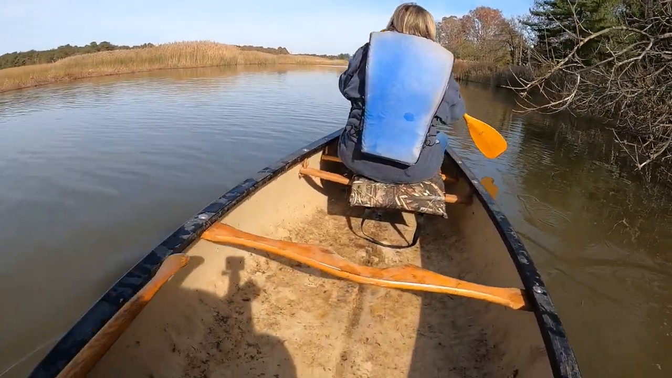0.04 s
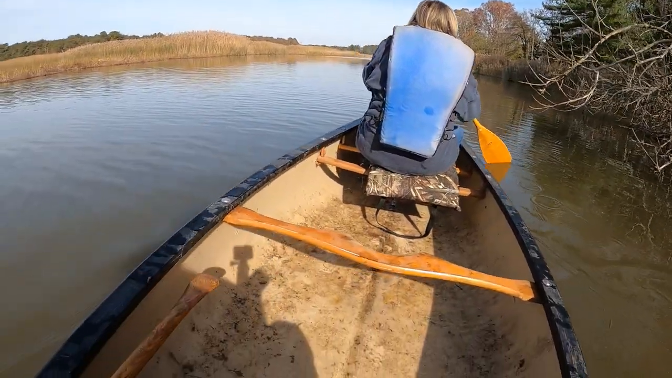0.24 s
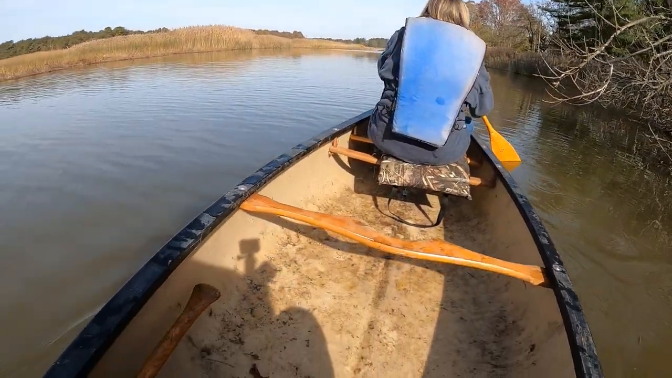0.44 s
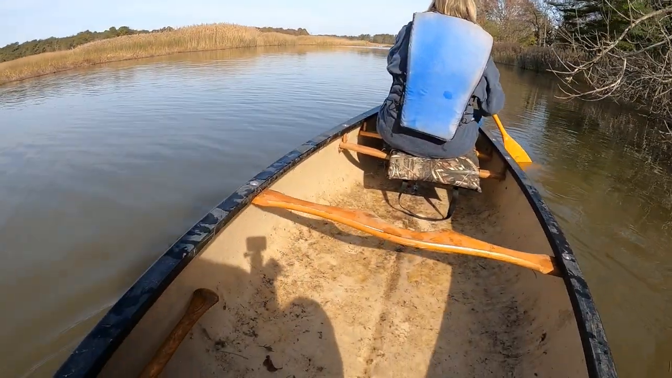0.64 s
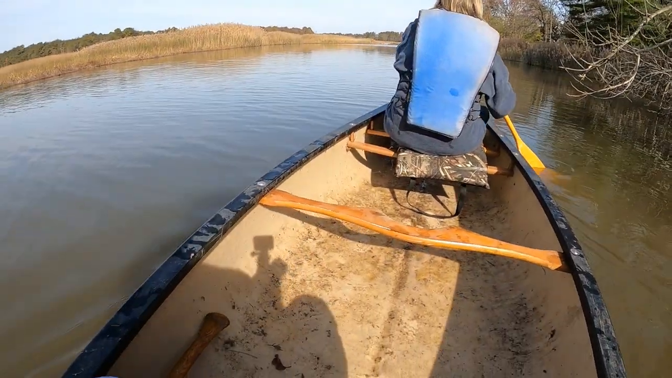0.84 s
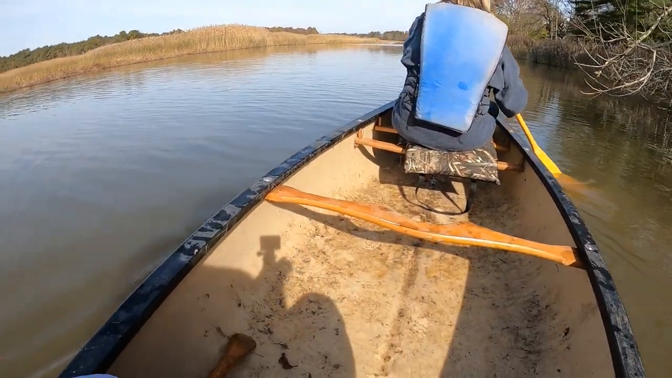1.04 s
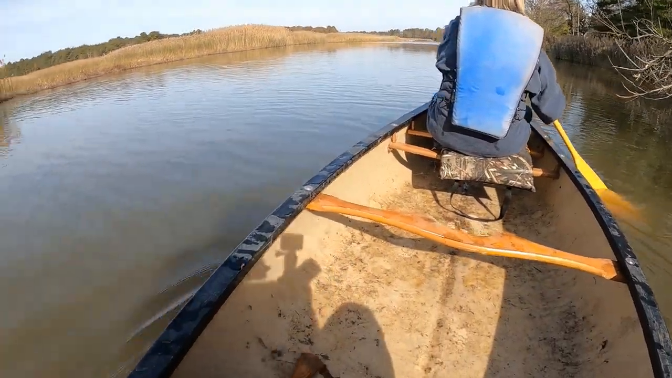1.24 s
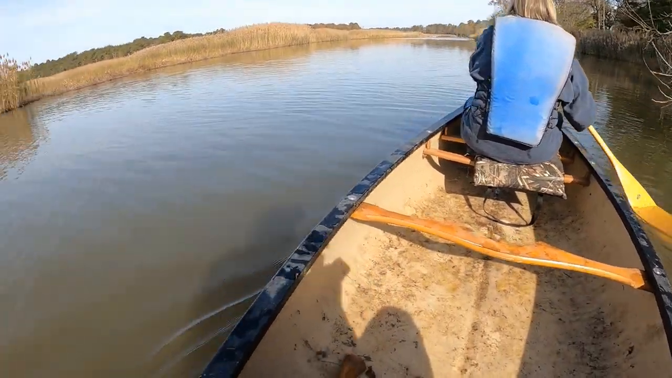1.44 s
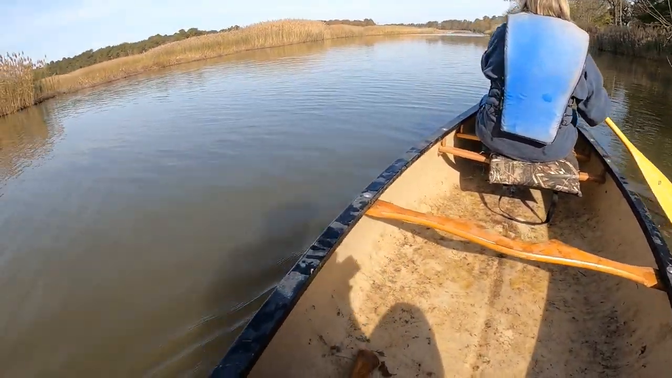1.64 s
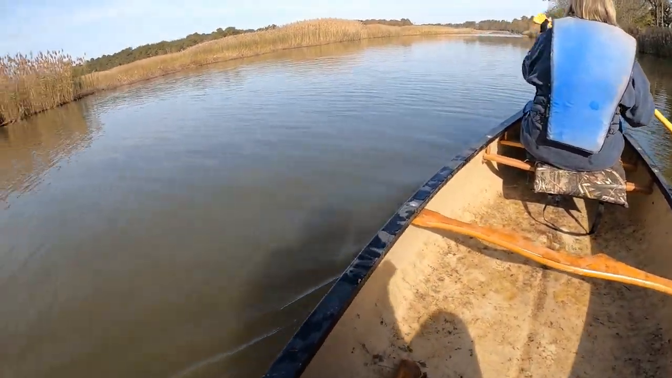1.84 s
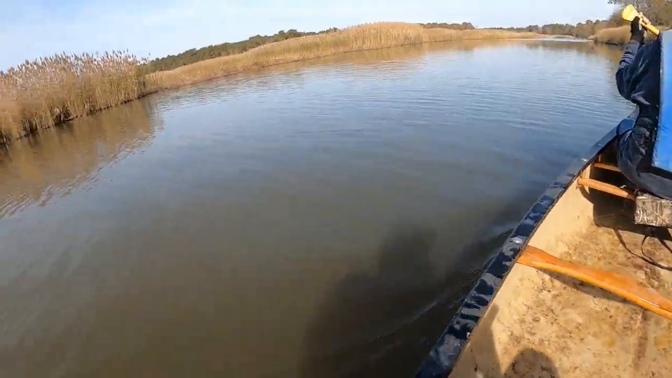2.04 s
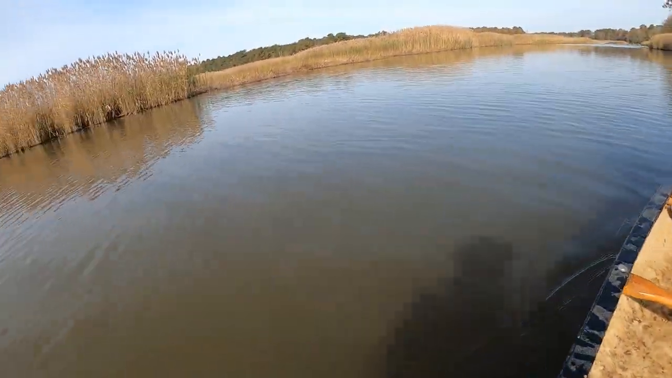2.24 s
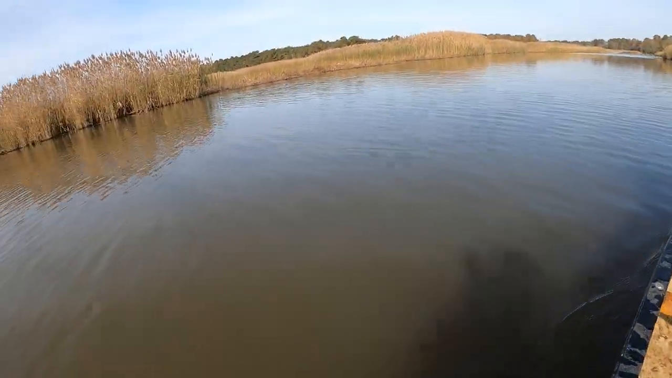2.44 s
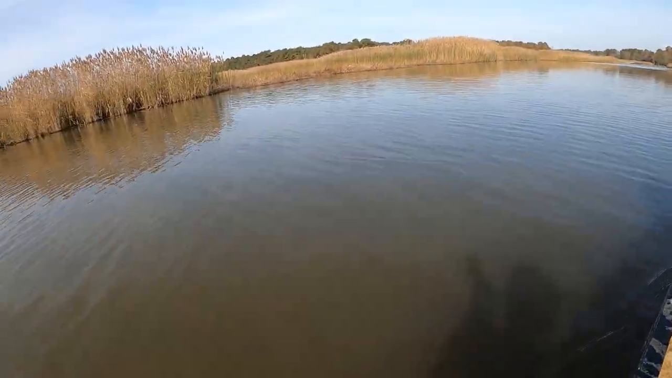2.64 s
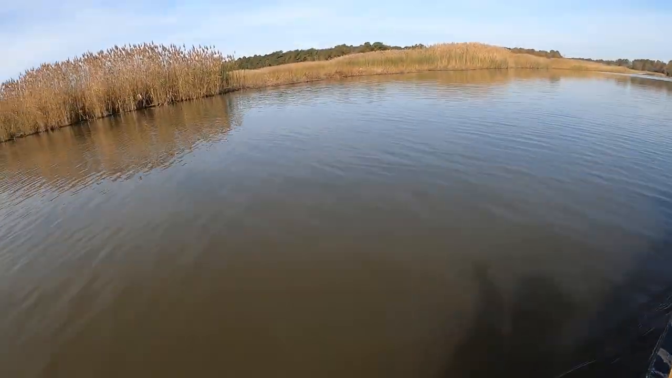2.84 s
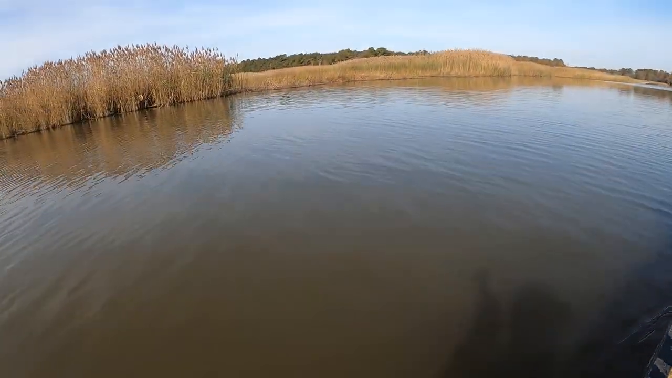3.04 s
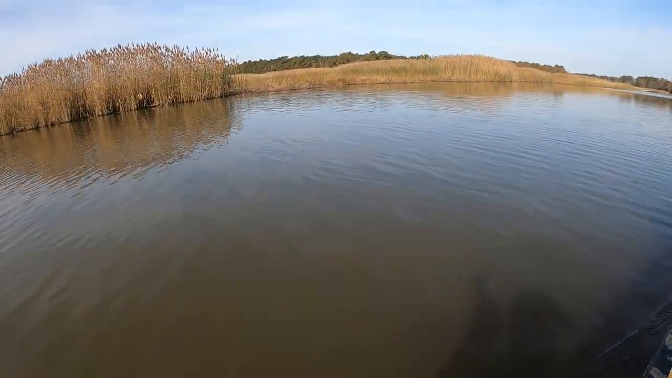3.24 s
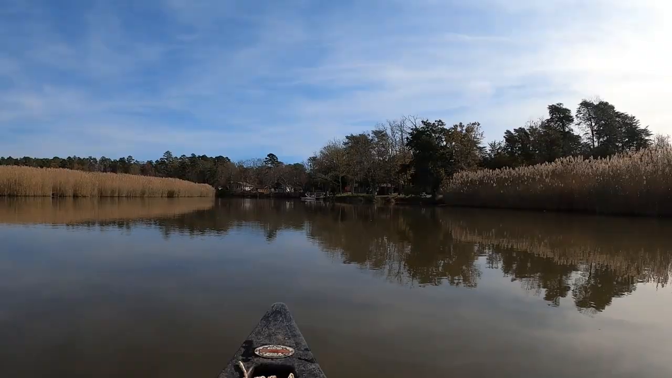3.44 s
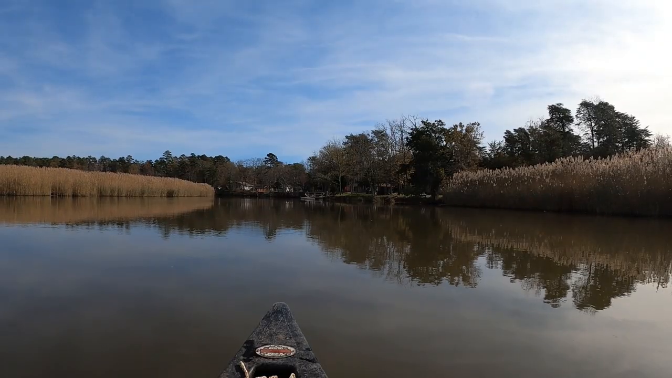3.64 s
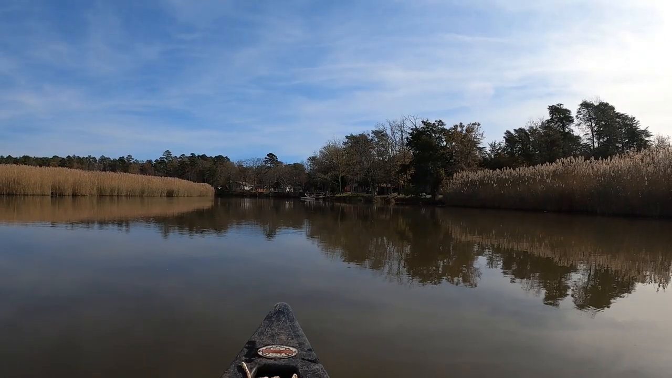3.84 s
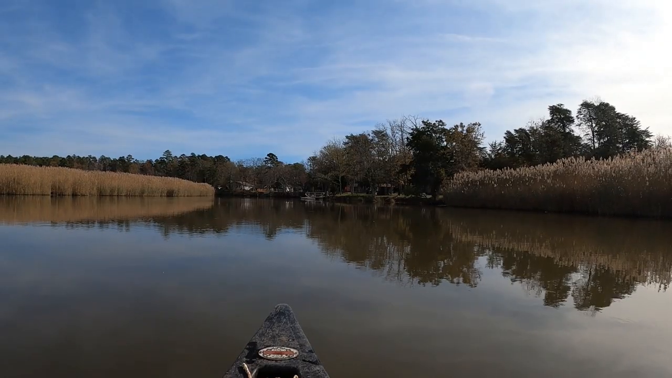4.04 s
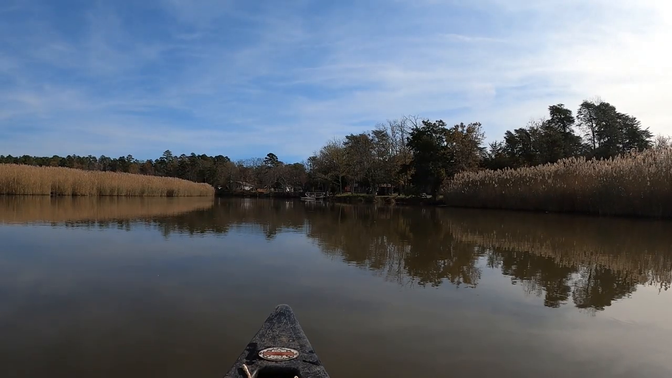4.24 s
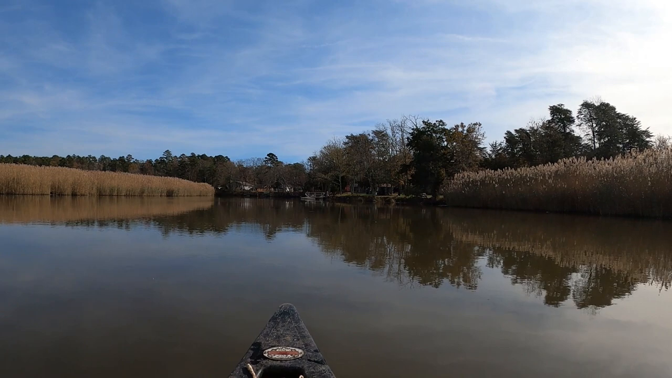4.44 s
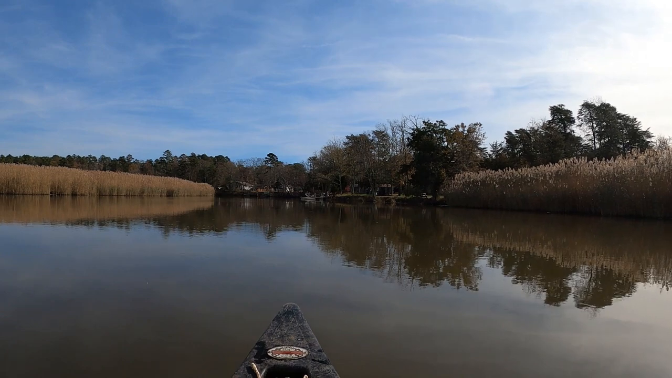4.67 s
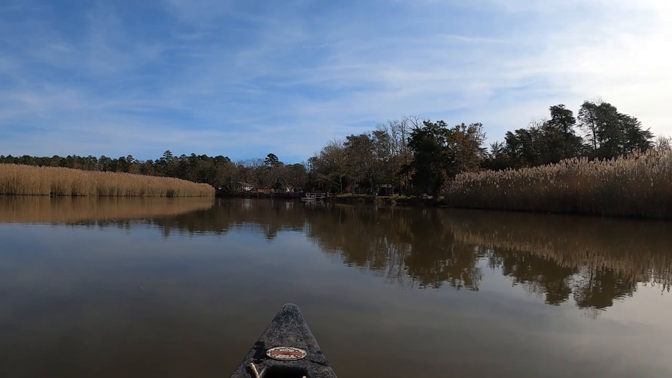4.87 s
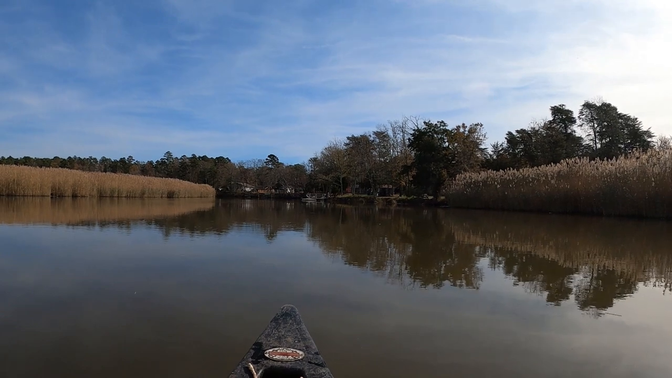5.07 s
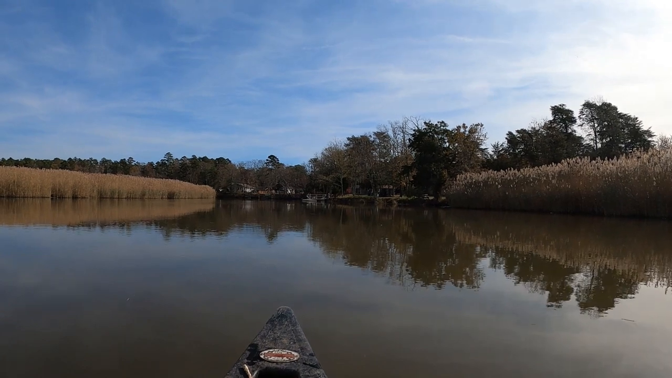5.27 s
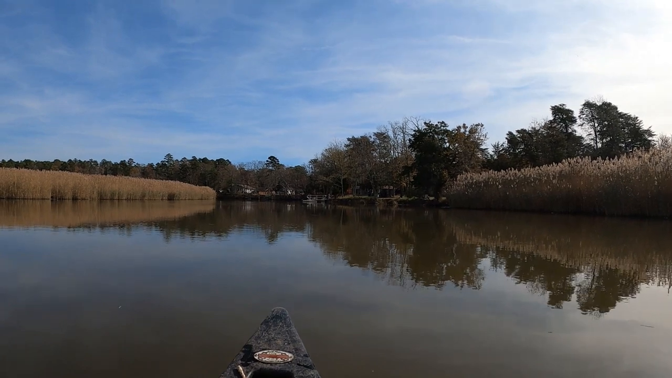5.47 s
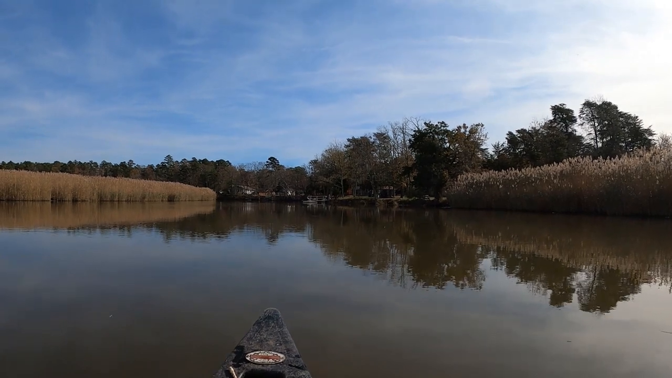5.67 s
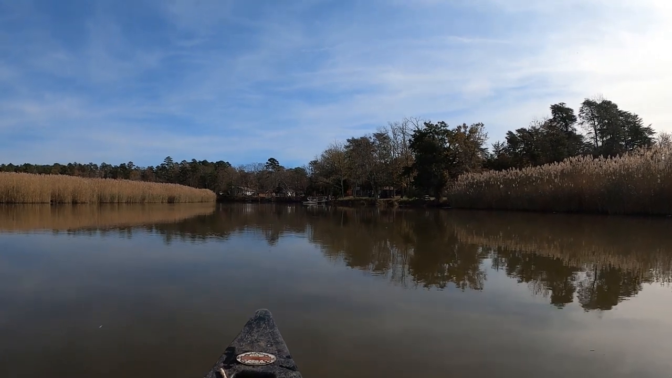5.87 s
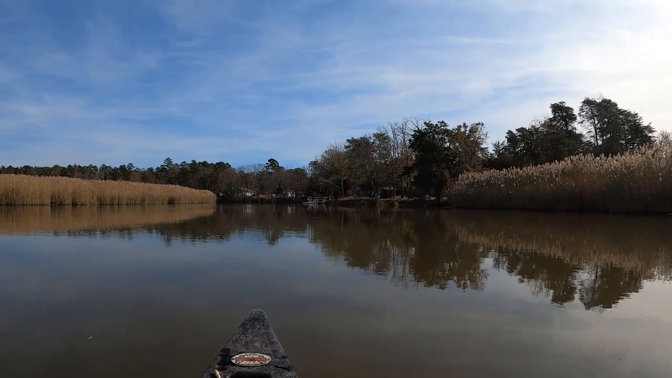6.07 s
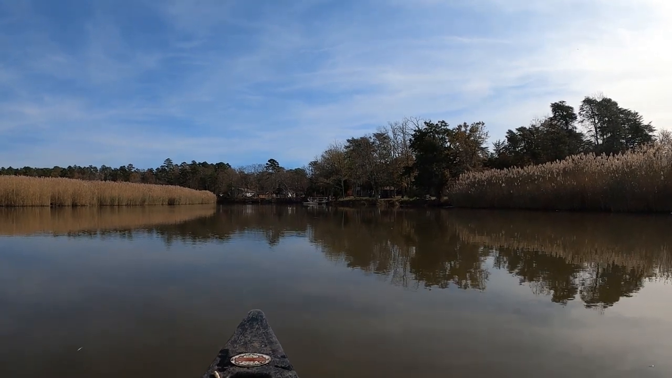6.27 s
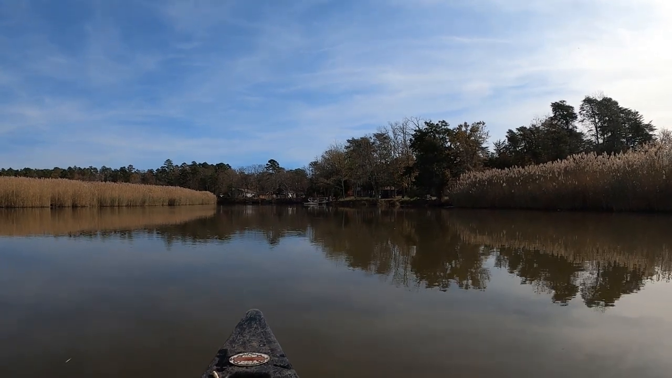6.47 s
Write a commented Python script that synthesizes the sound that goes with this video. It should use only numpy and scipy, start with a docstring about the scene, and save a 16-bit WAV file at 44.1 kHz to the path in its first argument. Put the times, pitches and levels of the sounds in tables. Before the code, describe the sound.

Hollow knocks and scrapes on a canoe hull over a low motor hum, then handling clicks, a brief gap, and quiet open water with small gurgles.

```python
"""In a canoe on open water, a wooden paddle is laid down: struck shaft and hull modes ring as it bounces and skids.
An electric trolling motor hums on its shaft orders; a nylon sleeve swishes as grainy noise and the mount ticks.
After a short silence the scene moves to the bow: filtered noise makes a low rumble with a faint hiss,
a far bird whistles in arcs of pitch, and water slaps and gurgles as spray noise and ringing bubbles."""
import sys
import numpy as np
from scipy import signal
from scipy.fft import rfft, irfft, next_fast_len
from scipy.io import wavfile
from scipy.ndimage import map_coordinates

SR = 44100
rng = np.random.default_rng(int(sys.argv[2]) if len(sys.argv) > 2 else 0)


def transcribe(signal):
    """Save signal, clipped to [-1, 1], as a 16-bit WAV file at the path in sys.argv[1]."""
    frames = np.atleast_2d(signal).T
    limited = np.clip(frames, -1, 1)
    pcm = np.round(limited * 32767).astype(np.int16)
    wavfile.write(sys.argv[1], SR, pcm)


N = 287119
TIME = np.arange(N) / SR  # s
RING = np.arange(SR // 2) / SR  # half a second for each short sound, s

# Rumble level through each view: t/s, level/dB
STERN_FLOW = [(0, -38), (.55, -36.5), (.8, -40.5), (.9, -45), (1.1, -38.5), (1.7, -41), (2.15, -38.5),
              (2.5, -40.5), (3.3, -43)]
BOW_FLOW = [(3.6, -44.5), (4.05, -42.5), (4.3, -45), (5.5, -46), (6.5, -44)]
# Spectra of the rumble at stern and bow, and of the open-air hiss: f/Hz, level/dB
STERN_RUMBLE = [(15, -2), (30, 2), (70, 8.5), (110, 0), (180, -3), (260, -11.5), (400, -26), (800, -53),
                (2000, -69.5)]
BOW_RUMBLE = [(12, -5.5), (25, -5.5), (60, 1), (100, -2), (150, -8), (220, -9.5), (290, -10), (360, -23.5),
              (450, -29.5), (700, -36), (2000, -74.5)]
AIR = [(250, -14), (500, -2), (700, -4.5), (1000, -1.5), (1500, -6), (2200, -10.5), (3200, -14.5),
       (4500, -16), (6000, -18), (7500, -19.5), (9000, -33), (12000, -37.5), (15000, -49.5)]
# Left-right correlation of the rumble: f/Hz, correlation
LOW_ALIKE = [(25, 0.71), (70, 0.95), (200, 0.92), (500, 0.64), (1200, 0.26)]
STERN_AIR_DB, BOW_AIR_DB = -28.5, -31.5  # hiss relative to the rumble

# Motor shaft speed: t/s, f/Hz
MOTOR = [(0, 57.8), (1.4, 62.5), (2.3, 63.39), (3.28, 64.25)]
# Shaft orders from 1 upward: level at cruising speed/dB rms, growth with speed/(dB per Hz)
HUM = [(-40, 1.77), (-41, 3), (-60, 3), (-65, 1)]
CRUISE_HZ = 64

# Sleeve strokes: start t/s, end t/s, level at the end/dB, low-pass f/Hz
SWISHES = [(0.053, 0.105, -56, 4440), (0.728, 0.82, -69, 5470), (1.074, 1.242, -51, 3300),
           (1.464, 1.511, -58, 5200), (1.829, 1.905, -57, 3700), (1.969, 2.058, -48.5, 3520),
           (2.036, 2.105, -42.5, 3350), (2.147, 2.428, -64, 2350), (2.402, 2.501, -57, 3280),
           (2.522, 2.566, -50, 4190), (2.571, 2.743, -56.5, 4650), (4.324, 4.55, -74, 5170)]
# Spectrum of nylon rubbing: f/Hz, level/dB
NYLON = [(200, 4.5), (900, -1), (1500, -4), (2300, -1), (3300, -1), (4600, -2), (6000, -2.5), (7500, -2),
         (9000, -9), (12000, -7.5), (15000, -22)]
SWELL_DB, SLEEVE_EDGE_S = 4.5, .033  # growth over a stroke; soft start and stop

# Ticks on the mount: t/s, level/dB, spectral peak f/Hz
TICKS = [(.083, -46, 3620), (1.046, -49.5, 6370), (1.464, -50, 6100), (1.48, -47.5, 3000),
         (1.976, -44.5, 1950), (2.077, -29.5, 1640), (2.441, -32, 3300), (2.891, -50.5, 4800),
         (2.965, -31.5, 3420)]
# Soft pushes on the mount: t/s, level/dB before the envelope
BUMPS = [(2.08, -23), (2.273, -19), (2.963, -43)]
BUMP_HZ, BUMP_T60, BUMP_RISE_S = 60, .08, .014
# Modes of the plastic housing: f/Hz, relative level/dB
HOUSING = [(560, -3.5), (680, 0.5), (790, -3.5), (930, -2.5), (1250, -26.5), (1950, -13.5)]
HOUSING_T60 = .055  # s
# Ring under a tick of HOUSING_HZ; sharper ticks ring the housing less
HOUSING_DB, HOUSING_HZ, HOUSING_DB_PER_OCTAVE = -6.5, 2410, -2.5
# Stereo tilt of sleeve and ticks through the housing: f/Hz, left minus right level/dB
HANDLING_BALANCE = [(150, 4), (450, -6.5), (1000, -0.5), (2000, 2.5), (4200, 5), (8000, 1)]

# Paddle blows: t/s, strength/dB, hardness (low-pass) f/Hz, boom level before a common gain/dB, boom f/Hz
KNOCKS = [(.305, -18, 4300, -7.5, 171.6), (.336, -24.5, 1000, -25, 262.3), (.357, -27.5, 1990, -19, 129.5),
          (.377, -32, 900, -14, 166.8), (.408, -21.5, 3020, -20, 147.3), (.491, -39.5, 2400, -40, 134.5),
          (.553, -25.5, 2800, -18, 116.7), (0.592, -25.5, 1770, -19, 141.8),
          (.625, -24.5, 3080, -15.5, 122.2), (0.655, -41, 7100, -17, 117.7), (1.045, -32, 2300, -23, 227.6),
          (1.063, -31.5, 1370, -14.5, 154.6), (1.117, -36.5, 1210, -21.5, 158.6),
          (1.195, -40, 870, -25, 147.1), (1.522, -31, 1090, -26, 130.7), (1.54, -26.5, 712, -27, 136),
          (1.578, -39.5, 600, -34.5, 178.7), (1.592, -37, 650, -27.5, 184)]
# Modes of the wooden shaft: f/Hz, relative level/dB, T60/s
SHAFT = [(1126, -8, .065), (1284, -5.5, 0.069), (1533, -3, .06), (1712, -5.5, 0.03), (1963, 2, 0.053),
         (2200, 2.5, 0.041), (2430, -11, 0.082), (2680, -9, 0.041), (2820, -9.5, 0.074),
         (3250, -9.5, 0.056), (3580, -8.5, 0.045), (3770, -9.5, 0.051), (4130, -22, 0.028),
         (4500, -22.5, 0.033), (5680, -15, .035)]
# Modes of the hull panels: f/Hz, relative level/dB, T60/s
HULL = [(70, 0, 0.38), (92, -3, 0.43), (118.4, -0.5, 0.34), (161.4, -5, 0.68), (175, 4.5, .4),
        (209, -0.5, .22), (253, -0.5, 0.35), (315.5, -3.5, .18), (324, -1.5, 0.1), (334, -9, 0.38),
        (417, -1.5, .14), (439, 2, 0.13), (483.2, -0.5, 0.095), (539, -13.5, .11), (616, -7, 0.18),
        (668, -8, .12), (688, -5.5, 0.062), (734, -14, 0.072), (860, -6.5, 0.065), (905, -8, .08),
        (966, -6.5, .1)]
# Spectrum of the contact noise: f/Hz, level/dB
CRACK = [(300, -16), (900, -2), (2000, 0.5), (3500, -3.5), (6000, -9), (8000, -16), (11000, -26),
         (15000, -37)]
# Dense modes of the boat, decay: f/Hz, T60/s; and spectrum: f/Hz, level/dB
RATTLE_T60 = [(100, 0.15), (400, 0.23), (1000, .12), (3000, .07), (9000, .05)]
RATTLE = [(40, -10.5), (150, -3), (300, 4.5), (600, -10), (1200, -11.5), (1700, -13.5), (3000, -24),
          (8000, -38), (14000, -63.5)]
# Left-right correlation of struck sounds: f/Hz, correlation
WOOD_ALIKE = [(200, 1), (600, 0.53), (1000, 0.65), (1800, 0.03), (4000, 0.12)]
# Stereo tilt of the shaft, which lies to the left: f/Hz, left minus right level/dB
SHAFT_BALANCE = [(500, 2), (1100, 6), (2000, 1), (4000, 3.5), (8000, 1)]
# Clack gain is 0 dB at hardness CLACK_HZ; harder blows clack more, up to a limit
CLACK_HZ, CLACK_DB_PER_OCTAVE, CLACK_MAX_DB = 3300, 15, 4.5
# Random spread of mode levels from blow to blow
SHAFT_SCATTER_DB, HULL_SCATTER_DB, HOUSING_SCATTER_DB = 2, 3.5, 2.5

# Paddle skids between bounces: start t/s, end t/s, level/dB
SKIDS = [(0.306, 0.421, -50.5), (0.545, 0.645, -48)]
# Spectrum of the skid: f/Hz, level/dB
SKID = [(200, -3.5), (420, -4), (600, -0.5), (900, -3), (2000, -8), (4000, -22), (8000, -36.5),
        (14000, -53.5)]
SKID_TAIL_T60 = 0.25  # s

# Single drips and plops: t/s, level/dB before the envelope, starting f/Hz
BUBBLES = [(2.47, -42, 2680), (2.885, -39.5, 2370), (2.89, -30, 1032), (3.069, -49, 2500),
           (4.85, -50, 5230), (4.881, -56, 5880), (4.882, -56, 1560), (5.345, -48.5, 1650),
           (5.43, -52, 980), (5.466, -42, 953), (5.462, -46, 1460), (5.685, -41.5, 582),
           (5.709, -41.5, 696), (5.77, -54.5, 6060), (5.815, -37.5, 1195), (5.842, -38.5, 1430),
           (5.92, -41, 945), (6.025, -46, 2270), (6.151, -50, 814), (6.276, -38, 690), (6.294, -52, 3000),
           (6.338, -36, 846), (6.457, -42, 845)]
# Wavelets breaking at the bow: t/s, hold/s, level/dB
LAPS = [(5.438, 0.017, -68.5), (5.643, 0.053, -62.5), (5.688, 0.028, -62.5), (5.734, 0.072, -64),
        (5.8, 0.062, -57.5), (5.902, 0.099, -58.5), (6, .03, -54), (6.142, 0.006, -61),
        (6.266, 0.034, -59.5), (6.325, 0.0083, -52.5)]
# Spectrum of the spray: f/Hz, level/dB
SPLASH = [(300, -8), (480, 1.5), (700, 0.5), (1000, 0.5), (1500, -10.5), (2200, -10), (3200, -17.5),
          (4500, -24.5), (6000, -29), (8000, -33.5), (12000, -57)]
LAP_RISE_S, LAP_T60 = 0.011, 0.15  # s
TRICKLE_DB, TRICKLE_START_S = -72, 5.33  # steady trickle under the wavelets
PLOP_WOBBLE, FIZZ_DB, FIZZ_SPREAD_DB = .5, -6.5, 3

# Bird whistles: t/s, length/s, mid-whistle level before the trees/dB, first f/Hz, middle f/Hz, last f/Hz
BIRD = [(3.689, 0.037, -68, 3050, 2730, 2550), (3.831, 0.087, -67.5, 2450, 2160, 2500),
        (5.036, 0.13, -65.5, 2880, 2550, 2690), (5.146, .06, -70.5, 2676, 2580, 2260),
        (5.239, 0.053, -70.5, 2290, 2406, 2490)]
WHISTLE_ARCH_DB = 3  # drop toward both ends of a whistle

MUTE_S, RESUME_S, FADE_IN_S = 3.277, 3.57, .07
TOP_HZ = 14000  # upper band limit


def amp(db):
    """A level in decibels corresponds to an exponential gain."""
    return 10 ** (np.asarray(db) / 20)


def unit(x):
    """Division by the root mean square gives rms 1."""
    return x / np.sqrt(np.mean(x ** 2) + 1e-20)


def fade(t60):
    """Exponential damping lowers the level 60 dB in t60 seconds."""
    return np.exp(-np.log(1000) * RING / t60)


def along(points, hz):
    """Values are interpolated on a logarithmic frequency axis."""
    f, v = np.transpose(points)
    return np.interp(np.log(hz + 1), np.log(f + 1), v)


def curve(rows):
    """Values are interpolated linearly in time, one per sample."""
    s, values = np.transpose(rows)
    return np.interp(TIME, s, values)


def gate(start, end, edge):
    """A rectangular window with linear edges is open from start to end."""
    return np.clip(np.minimum(TIME - start, end - TIME) / edge + .5, 0, 1)


def burst(start, hold, rise, t60):
    """An envelope rises linearly, then decays exponentially once hold seconds have passed."""
    age = TIME - start
    decay = np.exp(-np.log(1000) * np.maximum(age - hold, 0) / t60)
    return np.clip(age / rise, 0, 1) * decay


def wobble(rate, size=N):
    """Spline interpolation of random knots, rate per second, gives a smooth fluctuation."""
    coarse = np.append(TIME[:size:16], TIME[size - 1])
    knots = rng.standard_normal(int(size * rate / SR) + 4)
    return np.interp(TIME[:size], coarse, map_coordinates(knots, [coarse * rate]))


def add(track, s, sound):
    """Superposition adds a sound to a track at time s."""
    part = track[..., max(round(s * SR), 0):][..., :sound.shape[-1]]
    part += sound[..., :part.shape[-1]]


def filtered(x, response):
    """Linear filtering multiplies the spectrum by a frequency response."""
    n = x.shape[-1]
    m = next_fast_len(n + 8192)  # padding against wrap-around
    return irfft(rfft(x, m) * response(np.fft.rfftfreq(m, 1 / SR)), m)[..., :n]


def soften(x, hz):
    """A causal two-pole low-pass attenuates the treble above hz."""
    return signal.lfilter(*signal.butter(2, min(hz, SR / 2 - 1), fs=SR), x)


def placed(x, balance):
    """Interaural level difference, set frequency by frequency, tilts a stereo sound."""
    return filtered(x, lambda hz: amp(along(balance, hz) * np.array([[.5], [-.5]])))


def noise(spectrum, alike, size=N):
    """Independent mid and side noises set the interchannel correlation; coloured, rms 1."""
    def response(hz):
        angle = np.arccos(np.clip(along(alike, hz), -1, 1)) / 2
        return amp(along(spectrum, hz)) * [np.cos(angle), np.sin(angle)]

    mid, side = filtered(rng.standard_normal((2, size)), response)
    return unit(np.array([mid + side, mid - side]))


def modes(table, scatter_db):
    """Modal superposition: damped sines of random strength, neighbours in antiphase, skewed left to right."""
    hz, db, t60 = np.transpose(table)[:, :, None]
    size = amp(db + scatter_db * rng.standard_normal(hz.shape))
    phase = 2 * np.pi * hz * RING + np.pi * np.arange(len(hz))[:, None]
    skew = np.arccos(np.clip(along(WOOD_ALIKE, hz), -1, 1)) / 2
    ears = [np.sum(size * fade(t60) * np.sin(phase + side * skew), 0) for side in (-1, 1)]
    return np.array(ears) / np.linalg.norm(size)


def flow(level, spectrum, air_db, air_alike):
    """Turbulence: moving water and air rumble on the hull; a faint open-air hiss follows their level."""
    rumble = amp(1.1 * wobble(6.9)) * noise(spectrum, LOW_ALIKE)
    hiss = amp(air_db + 0.32 * wobble(4.1)) * noise(AIR, [(1000, air_alike)])
    return amp(curve(level)) * (rumble + hiss)


def motor():
    """Rotation excites harmonics of the shaft frequency, whose levels grow with speed."""
    hz = curve(MOTOR)
    turn = 2 * np.pi * np.cumsum(hz * (1 + .006 * wobble(8.8))) / SR
    hum = np.zeros(N)
    for order, (db, growth) in enumerate(HUM, 1):
        level_db = db + growth * (hz - CRUISE_HZ) + 1.8 * wobble(4.2)
        hum += amp(level_db) * np.sin(order * turn)
    return np.sqrt(2) * hum  # sine peak for a given rms


def sleeve():
    """Friction: nylon sliding over nylon gives a grainy hiss that swells through each stroke."""
    out = np.zeros((2, N))
    alike = [(300, .6), (1000, 0.085), (4000, 0.38)]  # f/Hz, left-right correlation
    age = RING - SLEEVE_EDGE_S / 2
    for start, end, db, bright_hz in SWISHES:
        length = end - start
        grain = amp(2.0 * wobble(400, size=len(RING)) + 1.5 * wobble(42.9, size=len(RING)))
        rub = unit(soften(noise(NYLON, alike, size=len(RING)) * grain, bright_hz))
        on = np.clip(np.minimum(age, length - age) / SLEEVE_EDGE_S + .5, 0, 1)
        swell = amp(db - SWELL_DB * np.clip(1 - age / length, 0, 1))
        add(out, start - SLEEVE_EDGE_S / 2, on * swell * rub)
    return out


def ticks():
    """Impulsive excitation: clicks on the mount ring the housing modes, and soft pushes thump low."""
    out = np.zeros((2, N))
    housing = [(hz, db, HOUSING_T60) for hz, db in HOUSING]
    for s, db, hz in TICKS:
        # f/Hz, level/dB
        colour = [(hz / 6, -12), (hz / 2, -4), (hz, 0), (hz * 1.64, -5), (hz * 2.0, -28), (hz * 4, -56)]
        envelope = (fade(0.011) + amp(-25.5) * fade(0.11)) * (1 - fade(.0008))
        click = noise(colour, WOOD_ALIKE, size=len(RING)) * envelope
        ring_db = HOUSING_DB + HOUSING_DB_PER_OCTAVE * np.log2(hz / HOUSING_HZ)
        add(out, s, amp(db) * (click + amp(ring_db) * modes(housing, HOUSING_SCATTER_DB)))
    for s, db in BUMPS:
        thump = np.sin(2 * np.pi * BUMP_HZ * RING) * fade(BUMP_T60) * (1 - fade(BUMP_RISE_S))
        add(out, s, amp(db) * thump)
    return out


def rattle():
    """Statistical modal density: noise stands for the boat's dense modes, damped by frequency."""
    hz, t, z = signal.stft(noise(RATTLE, WOOD_ALIKE, size=len(RING)), SR, nperseg=256)
    decay = np.exp(-np.log(1000) * t / along(RATTLE_T60, hz)[:, None])
    return signal.istft(z * decay, SR, nperseg=256)[1][:, :len(RING)]


def knocks():
    """Impact: each blow clacks in the shaft, booms in the struck panel and spreads through the hull."""
    out = np.zeros((2, N))
    for s, db, hard_hz, boom_db, boom_hz in KNOCKS:
        clack_db = min(CLACK_DB_PER_OCTAVE * np.log2(hard_hz / CLACK_HZ), CLACK_MAX_DB)
        # the wood chatters after the contact
        chatter = amp(-23.0 + 3.5 * wobble(300, size=len(RING))) * fade(0.14)
        crack = amp(4.5) * noise(CRACK, WOOD_ALIKE, size=len(RING)) * (fade(0.015) + chatter)
        clack = placed(modes(SHAFT, SHAFT_SCATTER_DB) + crack, SHAFT_BALANCE) * (1 - fade(0.0096))
        panels = (modes(HULL, HULL_SCATTER_DB) + amp(-6.5) * rattle()) * (1 - fade(0.008))
        boom_envelope = (fade(0.093) + amp(-22.0) * fade(0.78)) * (1 - fade(0.031)) ** 2
        boom = np.sin(2 * np.pi * boom_hz * RING) * boom_envelope
        # a softer contact lasts longer and leaves the high modes still
        struck = soften(amp(clack_db) * clack + amp(2.04) * panels, hard_hz)
        add(out, s, amp(db) * struck + amp(boom_db + 6.5) * boom)
    return out * amp([[.4], [-.4]])  # slightly to the left


def skids():
    """Rough sliding contact: wood scrapes over the hull, which rings on a little."""
    level = np.zeros(N)
    for start, end, db in SKIDS:
        level += amp(db) * burst(start, end - start, rise=0.011, t60=SKID_TAIL_T60)
    return level * unit(noise(SKID, WOOD_ALIKE) * amp(3 * wobble(150)))


def bubble(hz, cycles, rise):
    """Bubble resonance: a damped sine falls 60 dB in cycles / hz while its pitch rises near the surface."""
    life = cycles / hz
    age = RING[:int(life * SR) + 2] / life
    swell = 1 - np.exp(-age / .07)
    tone = np.sin(2 * np.pi * cycles * (age + rise * age ** 2 / 2))
    return tone * np.exp(-np.log(1000) * age) * swell


def water(count=400):
    """Entrained air: single bubbles plop, and wavelets at the bow break into spray and small bubbles."""
    plops, fizz = np.zeros(N), np.zeros(N)
    for s, db, hz in BUBBLES:
        add(plops, s, amp(db) * bubble(hz, cycles=56, rise=0.051))
    plops *= 1 + PLOP_WOBBLE * wobble(400)  # bubbles wobble roughly as they ring

    times = rng.uniform(TRICKLE_START_S, N / SR, count)
    pitches, sizes = rng.standard_normal(count), rng.exponential(size=count)
    for s, pitch, size in zip(times, pitches, sizes):
        hz = np.clip(1300 * np.exp(.6 * pitch), 500, 8000)
        db = FIZZ_SPREAD_DB * min(size, 3) + 0.62 * along(SPLASH, hz)
        add(fizz, s, amp(db) * bubble(hz, cycles=21, rise=0.27))
    spray = unit(noise(SPLASH, [(1000, 0.97)]) * amp(3.1 * wobble(220)))

    level = amp(TRICKLE_DB) * gate(TRICKLE_START_S, np.inf, edge=0.036)
    for s, hold, db in LAPS:
        level += amp(db) * burst(s, hold, LAP_RISE_S, LAP_T60)
    return plops + level * (amp(-3.0) * spray + amp(FIZZ_DB) * unit(fizz))


def bird():
    """Frequency modulation arcs each thin whistle; scattering by the trees blurs it."""
    out = np.zeros(N)
    for s, length, db, first_hz, middle_hz, last_hz in BIRD:
        u = np.linspace(-1, 1, int(length * SR))
        slope_hz = (last_hz - first_hz) / 2
        bend_hz = (first_hz + last_hz) / 2 - middle_hz
        hz = middle_hz + u * slope_hz + u ** 2 * bend_hz
        turn = 2 * np.pi * np.cumsum(hz * (1 + 0.0058 * wobble(200, size=len(u)))) / SR
        level = signal.windows.tukey(len(u), .2) * amp(db - WHISTLE_ARCH_DB * u ** 2)
        add(out, s, level * np.sin(turn))
    trees = rng.standard_normal(len(RING)) * fade(0.3)
    blurred = signal.fftconvolve(out, trees / np.linalg.norm(trees))[:N]
    return amp(-4.5) * out + amp(-9.5) * blurred


def scene():
    """Superposition of sources: first at the stern in stereo, then at the bow, the same in both ears."""
    both = water() + placed(sleeve() + ticks(), HANDLING_BALANCE)
    stern_flow = flow(STERN_FLOW, STERN_RUMBLE, STERN_AIR_DB, air_alike=0.24)
    stern = stern_flow + motor() + knocks() + skids() + both
    bow = flow(BOW_FLOW, BOW_RUMBLE, BOW_AIR_DB, air_alike=0.53) + bird() + both
    return np.where(TIME < (MUTE_S + RESUME_S) / 2, stern, bow.mean(0))


def record(dry):
    """Gating and band limitation: silence parts stern from bow, the bow fades in, the top is cut."""
    heard = gate(-1, MUTE_S, edge=.0005) + np.clip((TIME - RESUME_S) / FADE_IN_S, 0, 1)
    return filtered(dry * heard, lambda hz: hz < TOP_HZ)


dry = scene()
out = record(dry)
transcribe(out)
```